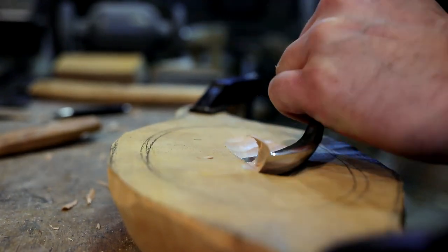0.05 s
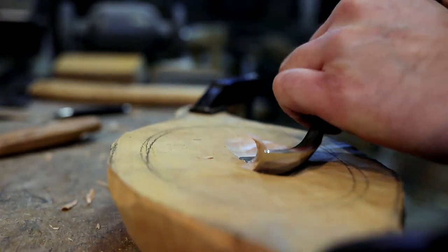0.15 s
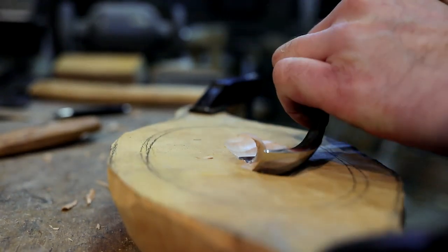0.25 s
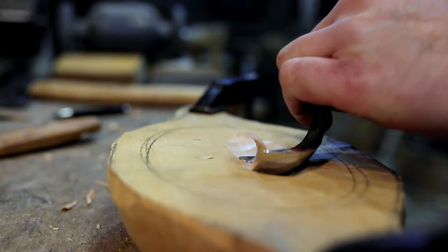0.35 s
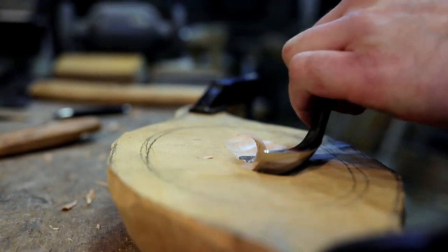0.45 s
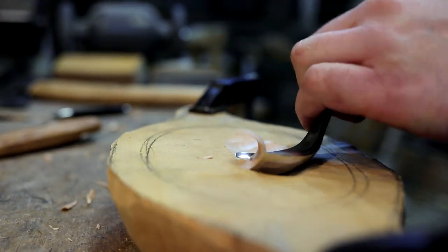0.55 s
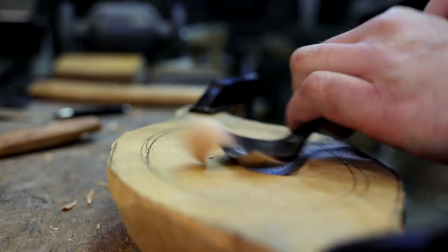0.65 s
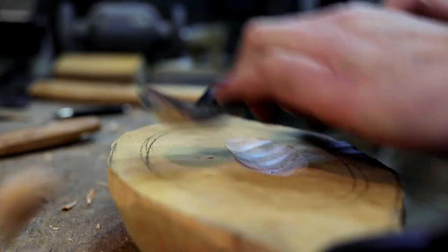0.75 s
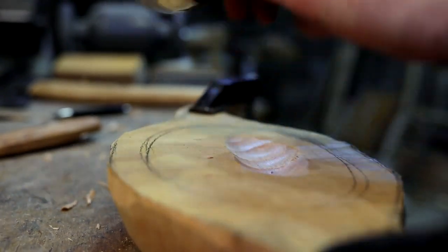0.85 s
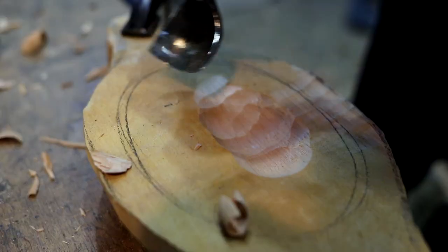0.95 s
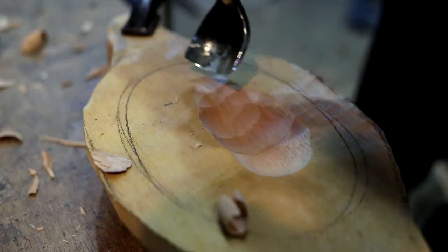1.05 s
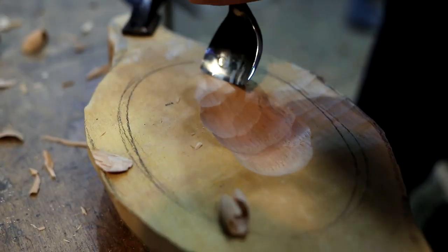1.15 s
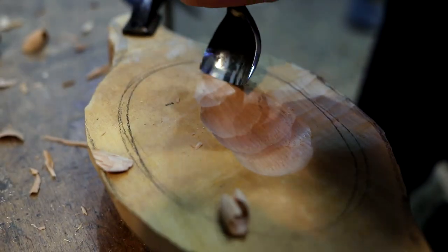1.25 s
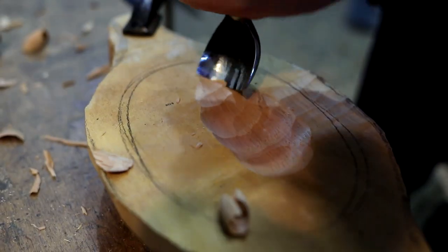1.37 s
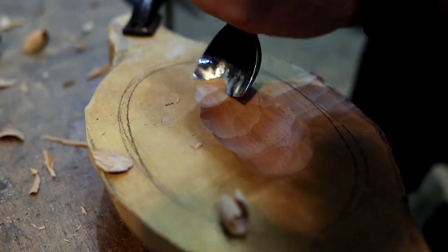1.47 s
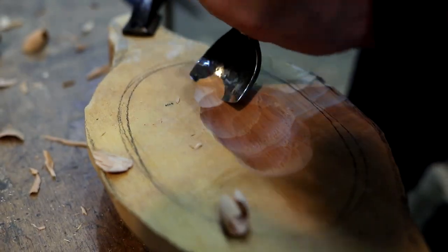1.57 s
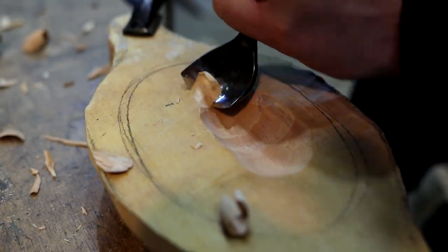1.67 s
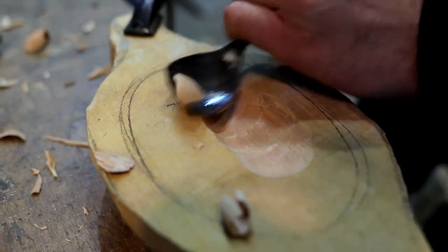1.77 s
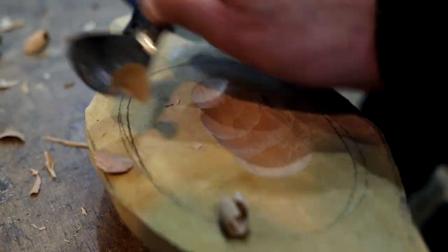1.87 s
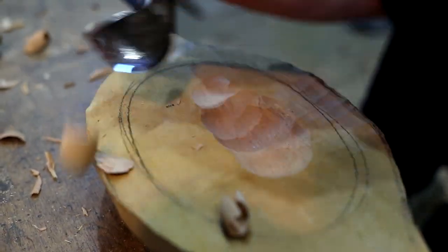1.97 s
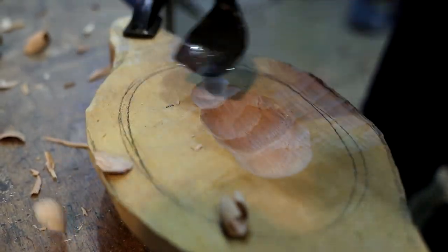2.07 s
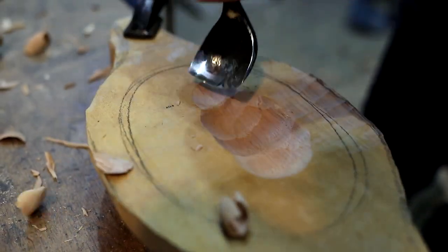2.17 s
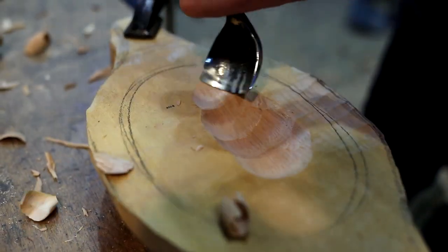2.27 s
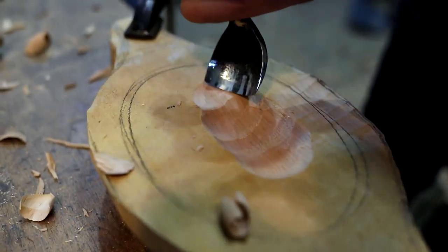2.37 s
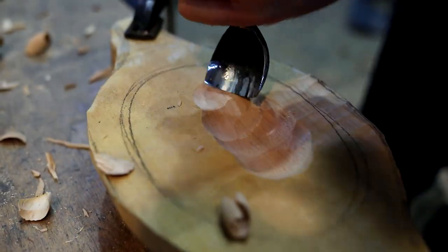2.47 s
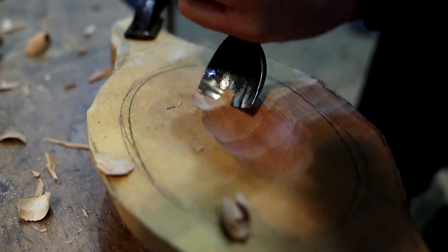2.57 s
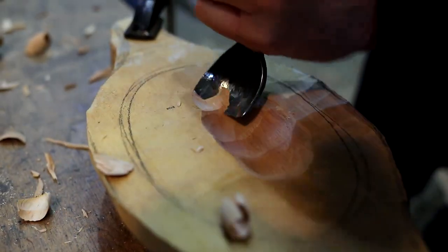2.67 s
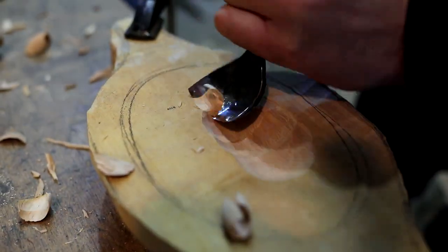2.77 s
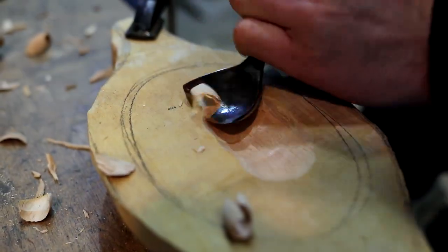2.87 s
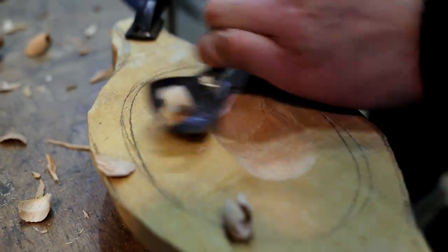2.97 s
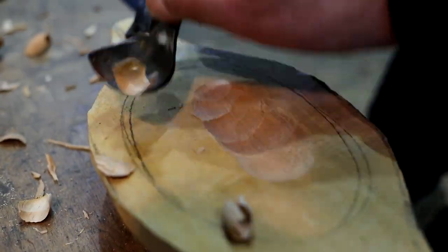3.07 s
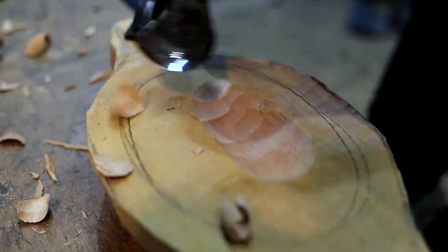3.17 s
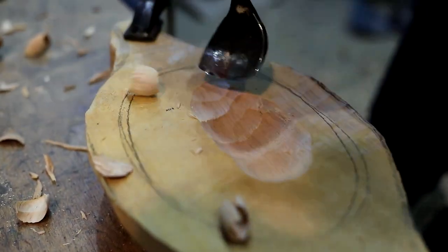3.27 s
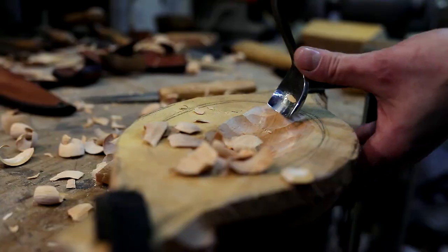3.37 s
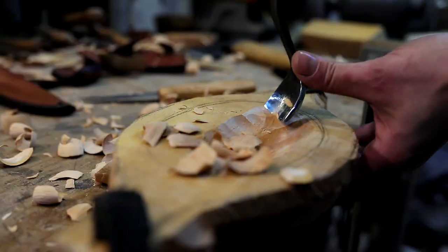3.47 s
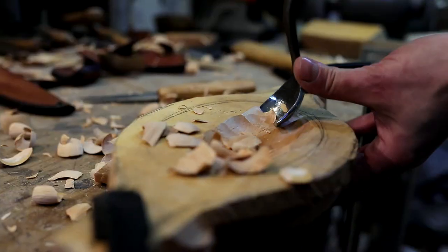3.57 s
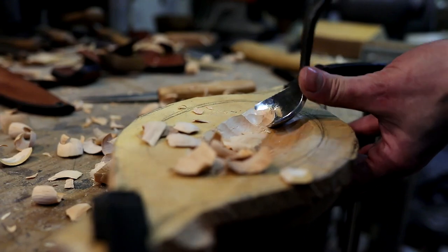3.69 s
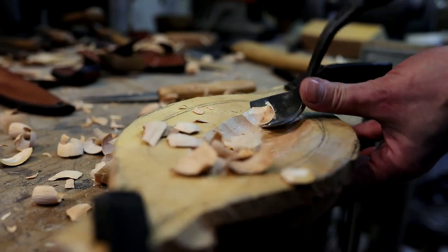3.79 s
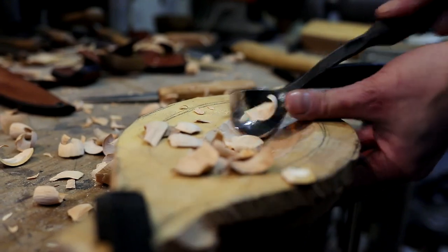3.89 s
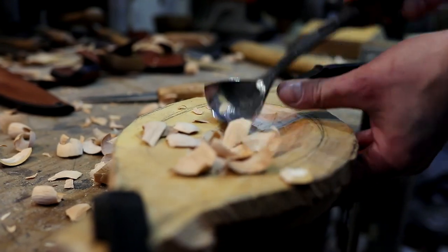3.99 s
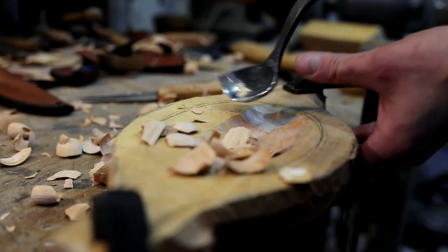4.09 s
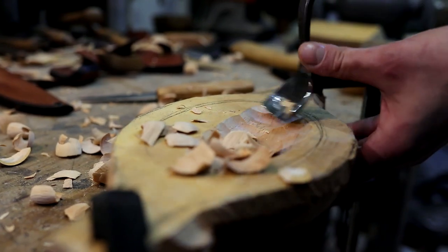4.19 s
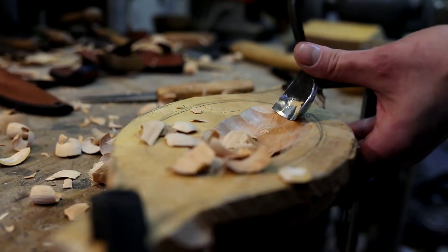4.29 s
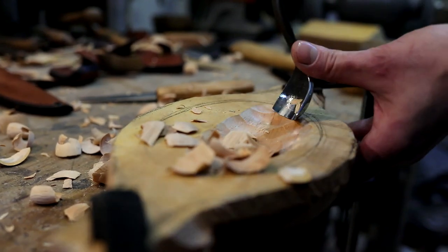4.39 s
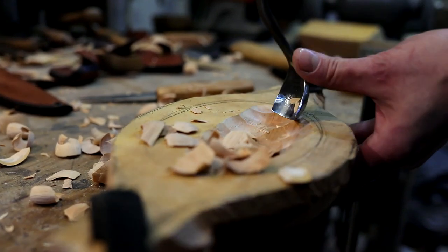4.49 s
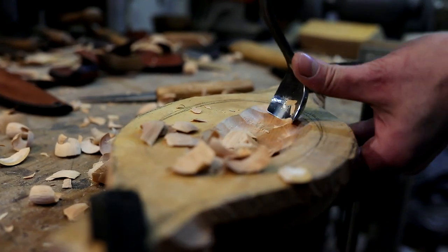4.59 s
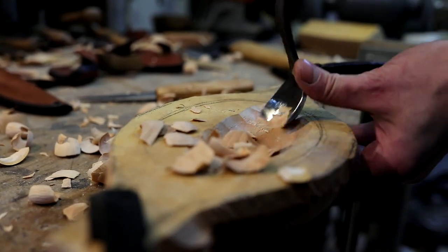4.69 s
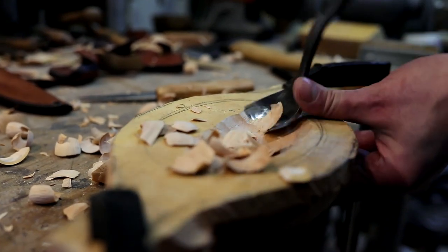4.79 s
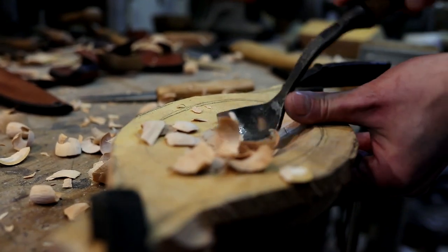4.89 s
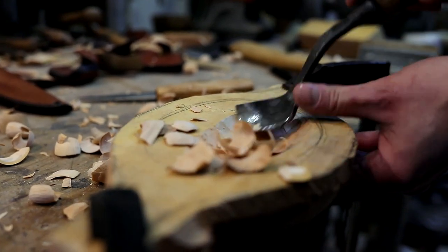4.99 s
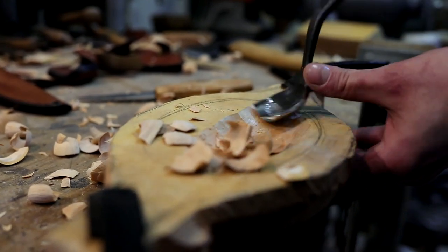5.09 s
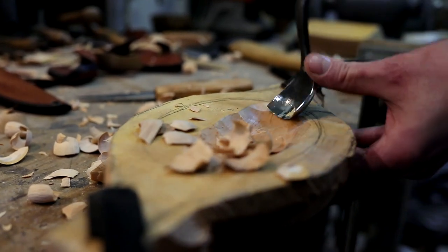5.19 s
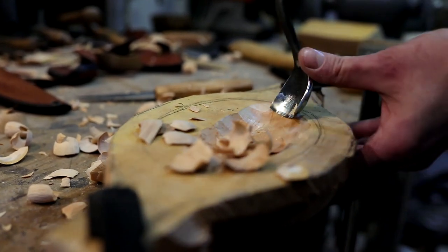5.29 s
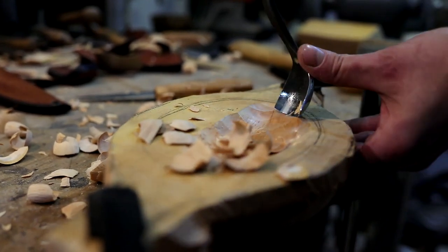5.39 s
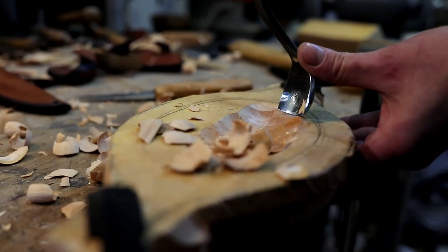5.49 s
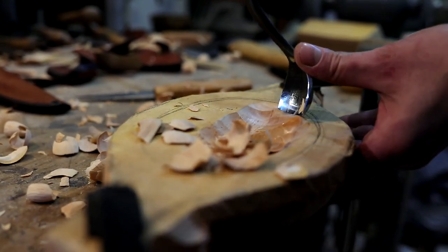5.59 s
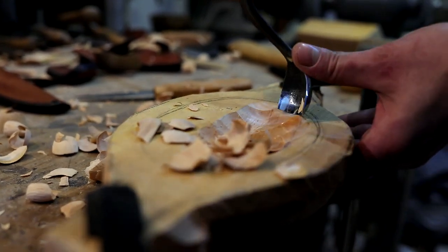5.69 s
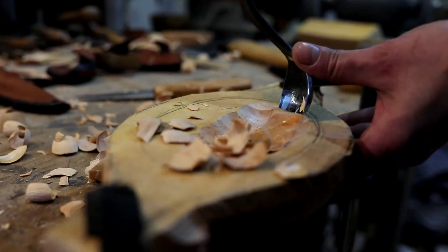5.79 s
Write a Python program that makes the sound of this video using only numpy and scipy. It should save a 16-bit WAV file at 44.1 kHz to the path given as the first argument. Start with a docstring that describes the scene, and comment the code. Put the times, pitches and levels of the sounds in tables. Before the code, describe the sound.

A carving gouge cuts a wooden blank, recorded close in a quiet, fairly dry workshop with faint hush and low bench rumble. A scrape is already fading at 0 s; a short fizzy rasp comes at 0.1-0.25 s, then a sharp crackling one at 0.55-0.75 s, with small ticks after. A dull double knock lands at 1.2 s. A longer grating stroke runs 1.4-1.85 s, followed by light ticks and low taps at 2.05-2.35 s. The next cut, 2.55-3.0 s, is bright and full of snapping fibres, its curl rattling briefly as it frees. From 3.5 to 4.0 s a deeper, woodier cut jerks and judders, ending with a thud. The hardest, hollow knock strikes at 4.3 s. Another stroke at 4.6-4.95 s swells and breaks off into a cluster of knocks until 5.2 s. A soft tap at 5.4 s and a barely audible scrape near 5.8 s finish.

```python
"""A carving gouge cuts curls from a wooden blank on a workbench, heard close in a quiet workshop.
At first a short scrape fades over a faint hush; two strokes follow, then a heavy knock at 1.2 s.
Four longer strokes alternate with taps, the hardest at 4.3 s, and a faint scrape ends the scene.
One effort per stroke sets the level of noisy fibre breaks sent through resonances of blank, steel and edge;
snaps, ticks and brushes are noise bursts, knocks are decaying modes, and the bench sways at low pitch."""
import sys
import numpy as np
from scipy import signal
from scipy.fft import rfft, irfft, next_fast_len
from scipy.io import wavfile
from scipy.ndimage import uniform_filter1d, map_coordinates

SR = 44100
rng = np.random.default_rng(int(sys.argv[2]) if len(sys.argv) > 2 else 0)


def to_wav(sig):
    """Store sig (one row per channel, or 1-D mono) as 16-bit WAV at the path in sys.argv[1].

    Samples outside -1..1 are clipped; the rate is SR.
    """
    pcm = np.clip(np.atleast_2d(sig), -1, 1) * 32767
    pcm = np.round(pcm).astype(np.int16)
    wavfile.write(sys.argv[1], SR, pcm.T)  # frames by channels


N = 257984

# Steady hush of workshop and microphone. Each row: frequency in Hz, relative spectral level in dB.
HUSH_SPECTRUM = [(15, -52), (25, -4), (55, -13.5), (84, -19), (1740, -34), (4030, -37), (5140, -40.5),
                 (5880, -42), (7310, -44), (13600, -44.5), (16000, -46)]
# The bench rocks when the arm swings. Each row: middle of the swing in seconds, level in dB.
BENCH_SWINGS = [(1.33, -42), (2.04, -29), (3.18, -35), (5.07, -42)]
SWING_S, CALM_DB = 0.12, -49.5  # standard deviation of each swell; level of the rocking in between

# Effort of each stroke, one list per stroke. Each row: time in seconds, level of the scrape in dB.
STROKE_EFFORTS = [
    [(0, -26.5), (.03, -35.5), (.07, -40)],
    [(.072, -47.5), (.1, -34.5), (.15, -24.5), (.19, -25), (.254, -42), (.33, -49)],
    [(.54, -55.5), (.566, -22.5), (.596, -36), (.626, -21), (.646, -34.5), (.678, -15), (.706, -30.5),
     (.87, -48.5)],
    [(1.37, -44), (1.4, -33), (1.47, -24.5), (1.54, -35.5), (1.6, -26.5), (1.67, -19.5), (1.78, -22.5),
     (1.85, -35.5), (1.95, -73)],
    [(2.53, -56.5), (2.575, -32), (2.615, -23.5), (2.65, -29.5), (2.76, -22.5), (2.885, -34.5),
     (2.91, -18.5), (2.955, -24.5), (3.0, -41), (3.14, -63)],
    [(3.44, -57), (3.5, -39.5), (3.585, -26), (3.67, -33.5), (3.7, -30), (3.74, -37), (3.76, -28),
     (3.92, -29.5), (4.03, -34), (4.15, -49)],
    [(4.585, -48.5), (4.605, -29.5), (4.645, -28.5), (4.72, -36), (4.745, -23.5), (4.79, -25.5),
     (4.84, -22.5), (4.89, -29.5), (4.92, -26), (4.96, -37.5), (5.1, -39)],
    [(5.7, -62), (5.76, -50), (5.85, -46.5)],
]
# How each stroke cuts, in the same order. Each row: moment the curl breaks free in seconds, blank over
# the effort in dB, its growth in dB per second, edge fizz over the effort in dB, its growth in dB per
# second, relative level of the freed curl's rattle in dB.
STROKE_CUTS = [(0, -2, 13, 0, 0, -58), (.21, -6.5, -6, 7.5, -70, -55), (0.709, -4.5, 18, -0.5, -29, -38),
               (1.82, -3, -4, -8, 9.5, -24), (2.941, -4, -8.5, -8, 7, -18),
               (3.946, 8, -9.5, -9.5, 13.5, -42), (4.916, 1, 17, -14, 37, -20),
               (5.85, -10, 2, 5.5, -0.5, -60)]
FIRM_DB = -28  # effort of an ordinary cut
PUSH_GROWS, FIZZ_GROWS = 1, 1.2  # dB per dB of effort
FREED_DB, FREED_S = (1, -9), 0.024  # change of blank and edge once the curl is free; time it takes
BLANK_T60_S, BLANK_TAIL_DB = 1, -9  # the blank shudders on after the edge eases
SETTLE_T60_S = 1.68  # hand and shavings settle after a stroke
SETTLE_DB = (-19, -26, -24.5)  # for the low, middle and high layer

# Moments from which the blank is held and cut at a new place, in seconds.
GRIP_STARTS = [0, 1.0, 3.41]
# Resonances of the blank under the blade. Each row: frequency in Hz, width in Hz, relative level in dB
# for each of the three grips.
PRESSED_BLANK = [(107, 34, -20, -6, -7.5), (165, 128, -11, -1, -9), (301, 43, 3, 3, -13.5),
                 (442.7, 34, 8, 10.5, 2.5), (522, 62, -0.5, -0.5, 3), (587, 27, -4.5, -5, 3),
                 (652, 24, 7, 2, -20), (784, 28, 2, -5, -17), (972, 25, 4.5, -21, -28)]
# Resonances of the gouge damped by the hand, while cutting. Each row: frequency in Hz, width in Hz,
# relative level in dB for each of the three grips.
GOUGE_STEEL = [(1065, 117, -5.5, -13.5, -16.5), (1317, 73, -2.5, -7, -17.5), (1389, 31, -6.5, -3.5, -5.5),
               (1554, 26, -6, -19, -1), (1574, 35, 1, -4.5, -4), (1660, 37, -16, -2, -14),
               (1785, 19, -4.5, -8, -6), (2180, 79, -29, -13, -12.5), (2764, 73, -13, -11, -3.5),
               (2992, 39, -13.5, -14.5, -5.5), (4030, 490, -35.5, -35, -34)]
# Resonances of the hollow of the edge and the curl. Each row: frequency in Hz, width in Hz, relative level in dB.
EDGE_HOLLOW = [(11240, 1450, -3), (7000, 390, -3.5), (14600, 5600, 0)]
# High modes of the sliding blade. Each row: frequency in Hz, width in Hz, relative level in dB, all per pass.
SLIDING_BLADE = [(4630, 360, 7), (6540, 950, 5), (7800, 510, 8.5), (9570, 840, 10.5), (12000, 6400, 2),
                 (14600, 570, 8)]
# The blade slides in before it bites. Each row: start in seconds, bite in seconds.
SLIDE_ENTRIES = [(1.36, 1.6), (2.53, 2.6), (3.44, 3.59), (4.57, 4.72)]

CURL_HZ, CURL_WIDTH_HZ = (950, 461), (235, 190)  # high, then low rattle; widths are per pass
CURL_RISE_S, CURL_FALL_S = 0.031, 0.037  # time constants of the onset and of the sinking pitch
CURL_T60_S = 0.34

# The loudest snapping fibres. Each row: peak of the burst in seconds, relative level in dB, colour in Hz,
# relative level of the steel ring in dB.
FIBRE_SNAPS = [(0.0924, -5, 11000, -39), (0.1029, 1, 11400, -32), (0.121, -4, 10200, -35),
               (0.1407, -0.5, 11100, -43), (0.5636, 7, 11900, -4.5), (0.578, 5.5, 11900, -22),
               (0.6191, -5, 10600, -10), (0.6833, -0.5, 10800, 6.5), (1.5877, -8, 13600, -2),
               (1.6614, 4.5, 12000, 0), (1.7066, 0.5, 10400, -7), (1.7967, -1.5, 6470, -37),
               (2.709, -8, 11300, -8), (2.715, -2, 12300, -2), (2.76, -1, 11100, -4), (2.7635, 3, 12300, 0),
               (2.7665, 4, 11200, -14), (2.7858, 2.5, 11400, -26), (2.8208, 4, 8000, 3),
               (2.8305, -10, 8400, -25), (2.8616, -1.5, 8500, -4), (2.908, -5.5, 7800, 3),
               (2.9155, 3, 7450, -30), (3.609, -6, 11000, -6), (3.698, -14, 10000, -11.5),
               (3.759, -8.5, 12000, -2), (3.8232, -7, 13300, -17), (3.885, -11, 10000, -10),
               (3.921, 7, 9500, -2.5), (3.98, -17, 9900, -7), (4.015, -21, 9000, -18),
               (4.0348, -23, 8000, -12), (4.0535, -10.5, 3880, -38), (4.8662, 4, 7220, -19),
               (4.883, -4, 9200, -34), (4.9085, -4, 4920, 2)]
SMALL_SNAPS = 60  # how many more break at random where the edge fizzes
SMALL_DB, SMALL_SPREAD_DB = 10, 2  # row level over the fizz; scatter to either side
SMALL_HZ, SMALL_RING_DB = 9600, -9  # middle colour; ring entry over the row level
# Fallen chips and the edge touching down, sudden. Each row: peak of the burst in seconds, relative level
# in dB, colour in Hz, relative level of the steel ring in dB.
CHIP_TICKS = [(0.306, -10, 12200, -12), (0.8835, -27, 3870, 1.5), (0.8945, -9.5, 6700, 1.5),
              (1.349, -17.5, 13600, -23), (1.3865, -25, 5400, -7), (1.9, -11.5, 6100, -15.5),
              (2.1105, -5, 10000, 0.5), (2.202, -17, 13600, -38), (2.2155, -4, 15300, -10.5),
              (2.264, -16, 13900, -19), (2.294, -34, 7000, -12), (2.3553, -16.5, 5670, -5.5),
              (3.231, -18.5, 12800, -15.5), (4.2945, -38, 3580, -9)]
# Hand and shavings brush the wood, soft. Each row: peak of the burst in seconds, relative level in dB,
# colour in Hz, relative level of the steel ring in dB.
SOFT_BRUSHES = [(0.818, -59, 7000, -30), (1.018, -39, 7460, -28), (1.078, -47, 7950, -33.5),
                (1.932, -35, 8100, -35), (2.06, -51, 13100, -44), (3.02, -35, 8000, -29),
                (5.07, -43, 3630, -30), (5.23, -37, 10000, -29.5)]

# The tool knocks and fallen chips tap on the wood. Each row: start in seconds, relative level in dB,
# centre of the blow in Hz, factor on the ring times of the modes.
WOOD_KNOCKS = [(1.2077, -9, 1020, 0.64), (1.2104, -2, 278, 0.51), (2.057, -27.5, 1100, 0.93),
               (2.184, -28.5, 1100, 0.56), (2.247, -31.5, 1090, 0.41), (2.295, -9.5, 277, 0.53),
               (2.338, -12, 261, 0.18), (2.353, -9, 349, 0.35), (2.97, -17.5, 890, 1.6),
               (3.02, -19.5, 980, 1.2), (3.25, -32, 1150, .5), (3.289, -34.5, 1160, 0.39),
               (3.977, -7, 345, 0.49), (4.291, 0, 704, 1.16), (4.908, -8, 360, 1.14),
               (5.034, -11, 526, 0.3), (5.048, -11, 530, 0.75), (5.1223, -12.5, 1500, 0.93),
               (5.1252, -6, 790, 1.45), (5.187, -11.5, 494, 1.13), (5.405, -24.5, 228, 0.68)]
# Modes of blank and bench when struck. Each row: frequency in Hz, time to fall 60 dB in seconds before
# the blow's factor, relative level in dB in the earlier grips, relative level in dB in the last grip.
STRUCK_MODES = [(164.7, 0.44, -3.5, -1.5), (222, 0.063, 17.5, 15), (246.4, 0.35, -4, -4.5),
                (285.1, 0.25, 3.5, 2.5), (423, 0.13, 1.5, 0.5), (548, 0.2, 1, -1.5), (712, 0.089, -3, -5),
                (794, 0.19, 1.5, 2), (860, 0.03, 13, -16), (1072, 0.064, -5.5, 0.5),
                (1165, 0.21, -7.5, -5.5), (1544, 0.025, -3, 9), (1787, 0.056, 2.5, -5),
                (2540, 0.02, 4.5, -18), (2970, 0.024, -2, -20)]

# The edge catches in the grain and jerks the blank. Each row: start in seconds, level of the push in dB.
GRAIN_CATCHES = [(1.549, -18.5), (1.825, -16), (3.569, -6), (3.608, -8), (3.757, -13.5), (3.93, -12.5),
                 (4.755, -16), (4.88, -13)]
CATCH_RISE_S, CATCH_T60_S = 0.002, 0.093

# Reverberation of the workshop. Each row: frequency in Hz, time to fall 60 dB in seconds.
SHOP_DECAY = [(150, 0.6), (700, 0.45), (2000, 0.18), (8000, 0.12)]
TOP_HZ = 15800  # band limit


def amp(db):
    """Logarithmic level: the amplitude gain of a level in dB."""
    return 10 ** (np.asarray(db) / 20)


def unit(x):
    """Power normalisation: scaled to rms 1."""
    return x / np.sqrt(np.mean(x ** 2) + 1e-20)


def along(points, hz):
    """Interpolation of (Hz, value) points on a logarithmic frequency axis."""
    f, v = np.transpose(points)
    return np.interp(np.log(hz + 1), np.log(f + 1), v)


def gains(rows):
    """Envelope interpolation: one gain per sample for each dB column, near silence outside the table."""
    s, *columns = np.transpose(rows)
    now = np.arange(N) / SR
    return np.array([amp(np.interp(now, s, db, left=-150, right=-150)) for db in columns])


def wobble(rate):
    """Slow random modulation: straight lines between random knots, rate knots a second."""
    knots = rng.standard_normal(int(N * rate / SR) + 4)
    return map_coordinates(knots, [np.arange(N) * rate / SR], order=1)


def filtered(x, response):
    """Linear filtering: the spectrum of x times a response of frequency."""
    m = next_fast_len(N + SR // 2)
    return irfft(rfft(x, m) * response(np.fft.rfftfreq(m, 1 / SR)), m)[..., :N]


def ringing(x, hz, width_hz):
    """Simple resonance: x through one resonator of gain 1 at its centre."""
    return signal.lfilter(*signal.iirpeak(hz, hz / width_hz, SR), x)


def resonant(x, peaks):
    """Modal superposition: x through (Hz, width, dB) resonances of alternating sign."""
    return sum((-1) ** k * amp(db) * ringing(x, hz, w) for k, (hz, w, db) in enumerate(peaks))


def held(x, peaks, damping=1, wander_db=0):
    """Changing boundary conditions: mode strengths follow the grip and wander as the edge travels."""
    grip = np.searchsorted(GRIP_STARTS, np.arange(N) / SR, "right") - 1
    total = 0
    for hz, width_hz, *db in peaks:
        drift = amp(wander_db * wobble(9)) if wander_db else 1
        total = total + ringing(x * amp(db)[grip] * drift, hz, width_hz * damping)
    return total


def blend(share, light, firm):
    """Power-preserving mixture: the firm sound holds this share of the power."""
    return np.sqrt(1 - share) * unit(light) + np.sqrt(share) * unit(firm)


def above(gain, db):
    """Soft threshold in power: rises from 0 to 1 as the gain passes db."""
    return gain ** 2 / (gain ** 2 + amp(db) ** 2)


def lingering(gain, t60):
    """Exponential energy decay: the power of a gain is smoothed and falls 60 dB in t60 seconds."""
    keep = amp(-2 * 60 / (t60 * SR))
    return np.sqrt(signal.lfilter([1 - keep], [1, -keep], gain ** 2))


def background():
    """Stationary coloured noise for the hush, and a slow oscillation of the bench under the arm."""
    hush = filtered(rng.standard_normal(N), lambda hz: amp(along(HUSH_SPECTRUM, hz)))
    rock_hz = 17 + 3.9 * wobble(1.3)
    rock = np.sin(2 * np.pi * np.cumsum(rock_hz) / SR)
    now = np.arange(N) / SR
    swings = sum(amp(db) * np.exp(-.5 * ((now - s) / SWING_S) ** 2) for s, db in BENCH_SWINGS)
    return amp(-45.5 + 0.67 * wobble(0.76)) * unit(hush) + (amp(CALM_DB) + swings) * unit(rock)


def effort():
    """Common control: one effort sets push, scrape and fizz, which linger; also marks the freed edge."""
    now, layers, out = np.arange(N) / SR, 0, 0
    for rows, cut in zip(STROKE_EFFORTS, STROKE_CUTS):
        free_s, blank_db, blank_growth_db, fizz_db, fizz_growth_db, _ = cut
        start_s, end_s = rows[0][0], rows[-1][0]
        over = gains(rows)[0] / amp(FIRM_DB)
        freed = np.clip((now - free_s) / FREED_S, 0, 1)
        travel_s = np.clip(now, start_s, free_s) - start_s
        push = amp(blank_db + FREED_DB[0] * freed + blank_growth_db * travel_s) * over ** PUSH_GROWS
        fizz = amp(fizz_db + FREED_DB[1] * freed + fizz_growth_db * travel_s) * over ** FIZZ_GROWS
        layers = layers + amp(FIRM_DB) * np.array([push, over, fizz])
        out = out + freed * (now < end_s)
    settling = amp(SETTLE_DB)[:, None] * lingering(layers[1], SETTLE_T60_S)
    layers[0] = np.hypot(layers[0], amp(BLANK_TAIL_DB) * lingering(layers[0], BLANK_T60_S))
    push, scrape, fizz = np.hypot(layers, settling)
    return push, scrape, fizz, out


def tearing(clumps, rate, spread_db, rub):
    """Random impulsive fracture: fibres break with widely spread strengths, over steady rubbing noise."""
    strength = amp(spread_db * np.minimum(rng.exponential(size=N), 4))
    breaks = (rng.random(N) < rate / SR) * strength * rng.standard_normal(N)
    return clumps * (unit(breaks) + rub * rng.standard_normal(N))


def cutting(push, scrape, fizz, out):
    """Source-filter principle: separate runs of tearing, clumped by one shared grain, drive blank, steel and edge."""
    grain = wobble(35) + wobble(130)
    torn_wood = tearing(amp(2.98 * grain), rate=900, spread_db=3.0, rub=0.97)
    wood = held(torn_wood, PRESSED_BLANK, wander_db=3.0)
    wood = ringing(wood, 450, 1220)  # thick wood passes little treble

    scraped = tearing(amp(2.0 * grain), rate=1500, spread_db=3.4, rub=1.3)
    steel = held(scraped, GOUGE_STEEL, wander_db=2)
    # loose shavings under the hand, blade lifted
    rustle = tearing(amp(3.6 * wobble(50)), rate=2200, spread_db=4.0, rub=0.35)
    firm_share = above(scrape, -39.0) * np.clip(1 - 1.5 * out, 0, 1)
    middle = blend(firm_share, ringing(rustle, 1000, 550), steel)

    slide = amp(3.3 * wobble(55)) * rng.standard_normal(N)
    slide = resonant(resonant(slide, SLIDING_BLADE), SLIDING_BLADE)  # twice: dark valleys
    crackle = 0
    for peak in EDGE_HOLLOW:  # separate breaks, so each resonance crackles partly on its own
        clumps = amp(0.5 * grain + 5.4 * wobble(60))
        crackle = crackle + resonant(tearing(clumps, rate=240, spread_db=6.5, rub=0.92), [peak])
    # faint: shavings, strong: tearing
    tear = blend(above(fizz, -50.0), ringing(rustle, 12000, 12000), crackle)
    now = np.arange(N) / SR
    entering = sum(1. * (a < now) * (now < b) for a, b in SLIDE_ENTRIES)
    entering = uniform_filter1d(entering, size=SR // 50)
    edge = blend(np.clip(1 - 2.9 * entering, 0, 1), slide, tear)
    return push * unit(wood) + scrape * middle + fizz * edge


def curls():
    """Hollow resonance: each freed curl tumbles over the blank, a rattle that sinks in pitch and dies."""
    bumps = tearing(amp(3.8 * wobble(40)), rate=250, spread_db=-3.0, rub=0.36)
    high, low = (ringing(ringing(bumps, hz, w), hz, w) for hz, w in zip(CURL_HZ, CURL_WIDTH_HZ))
    total = 0
    for free_s, *_, db in STROKE_CUTS:
        t = np.maximum(np.arange(N) / SR - free_s, 0)
        shape = (1 - np.exp(-t / CURL_RISE_S)) * amp(db - 60 * t / CURL_T60_S)
        total = total + shape * blend(1 - np.exp(-t / CURL_FALL_S), high, low)
    return total


def small_snaps(fizz):
    """Random fracture in proportion to power: snaps are likelier and louder where the fizz is strong."""
    draw = rng.random((SMALL_SNAPS, 3))
    chance = np.cumsum(fizz ** 2) / np.sum(fizz ** 2)
    at = np.searchsorted(chance, draw[:, 0]).clip(200, N - 1)
    db = 20 * np.log10(fizz[at]) + SMALL_DB + SMALL_SPREAD_DB * (2 * draw[:, 1] - 1)
    colour_hz = SMALL_HZ * 2 ** (draw[:, 2] - .5)  # spread over an octave
    return list(zip(at / SR, db, colour_hz, db + SMALL_RING_DB))


def snaps(rows, rise_s, fall_s):
    """Impulsive radiation: bursts with slopes of 60 dB in rise_s and fall_s, and jolts for the steel."""
    cracks, jolts = np.zeros(N + SR), np.zeros(N + SR)
    t = np.arange(-768, 1280) / SR  # short window around the peak
    hz = np.fft.rfftfreq(len(t), 1 / SR)
    shape = amp(np.where(t < 0, 60 * t / rise_s, -60 * t / fall_s))
    for s, db, colour_hz, ring_db in rows:
        burst = rng.standard_normal((2, len(t)))
        # brightest near its own colour
        tint = amp(-9.0) + amp(-40 * np.log2((hz + 1) / colour_hz) ** 2)
        crack = shape * unit(irfft(rfft(burst[0]) * tint * (hz > 2500)))
        at = max(round((s + t[0]) * SR), 0)
        cracks[at:][:len(t)] += amp(db - 7) * crack
        jolts[at:][:len(t)] += amp(ring_db + 5.0) * shape * burst[1]
    return np.array([cracks[:N], jolts[:N]])


def bursts(fizz):
    """Transient excitation of resonators: the edge hollow colours each crack, the jolt rings the steel."""
    total = snaps(FIBRE_SNAPS + small_snaps(fizz), rise_s=0.0074, fall_s=0.0064)
    total = total + snaps(CHIP_TICKS, rise_s=0.00033, fall_s=0.011)
    cracks, jolts = total + snaps(SOFT_BRUSHES, rise_s=0.046, fall_s=0.073)
    return 0.5 * cracks - resonant(cracks, EDGE_HOLLOW) + held(jolts, GOUGE_STEEL, damping=2.59)


def knocks():
    """Modal excitation by impact: a blow rings the modes near its centre most, soft low and hard high."""
    out, t = np.zeros(N + SR), np.arange(SR // 4) / SR
    fade = np.clip(10 - t / t[-1] * 10, 0, 1)
    for s, db, centre_hz, ring_factor in WOOD_KNOCKS:
        ring = 0
        for hz, t60, *levels in STRUCK_MODES:
            level = levels[int(s > GRIP_STARTS[-1])]
            octaves = np.log2(hz / centre_hz)
            slope_db = 6 if octaves < 0 else 5
            decay = amp(level - slope_db * octaves ** 2 - 60 * t / (t60 * ring_factor))
            # the many weak modes around it
            noise = rng.standard_normal(len(t))
            dense = 0.41 * unit(ringing(ringing(noise, hz, hz / 3), hz, hz / 3))
            tone = np.sin(2 * np.pi * (hz * t + rng.random()))
            onset = (1 - np.exp(-t * hz * 1.56)) ** 2  # low modes build more slowly
            ring = ring + decay * (tone + dense) * onset
        ring = ring / np.sqrt(np.mean(ring[:SR // 50] ** 2))
        out[round(s * SR):][:len(t)] += amp(db - 12.5) * fade * ring
    # wood on steel is a dull contact
    return signal.sosfilt(signal.butter(4, 4000, fs=SR, output="sos"), out[:N])


def catches():
    """Stick-slip forcing: each catch adds a push on the blank that comes fast and dies away."""
    total = 0
    for s, db in GRAIN_CATCHES:
        t = np.maximum(np.arange(N) / SR - s, 0)
        total = total + (1 - np.exp(-t / CATCH_RISE_S)) * amp(db - 60 * t / CATCH_T60_S)
    return total


def shop(x):
    """Diffuse reverberation: each frequency dies at its own speed, a fresh tail every third of a second."""
    wet, step = np.zeros(N + 2 * SR), SR // 3
    for start in range(0, N, step):
        hz, t, z = signal.stft(rng.standard_normal(SR // 2), SR, nperseg=256)
        decay = amp(-60 * t / along(SHOP_DECAY, hz)[:, None])
        tail = signal.istft(z * decay, SR, nperseg=256)[1]
        part = signal.fftconvolve(x[start:start + step], tail / np.linalg.norm(tail))
        wet[start + 200:][:len(part)] += part
    return wet[:N]


def scene():
    """Linear superposition: all sources close by, with the room behind."""
    push, scrape, fizz, out = effort()
    near = cutting(np.hypot(push, catches()), scrape, fizz, out)
    near = near + bursts(fizz) + knocks() + curls()
    return (near + amp(-14.5) * shop(near) + background())[None]


def record(dry):
    """Saturation and band limiting: peaks bend smoothly below full scale, then a steep low-pass acts."""
    full = dry / (1 + abs(dry) ** 8) ** (1 / 8)
    return filtered(full, lambda hz: 1 / (1 + (hz / TOP_HZ) ** 200))


dry = scene()
out = record(dry)
to_wav(out)
```